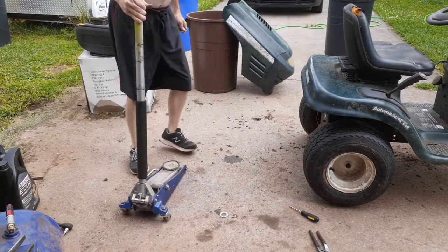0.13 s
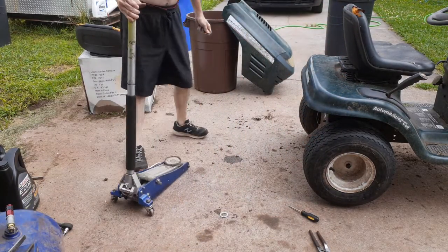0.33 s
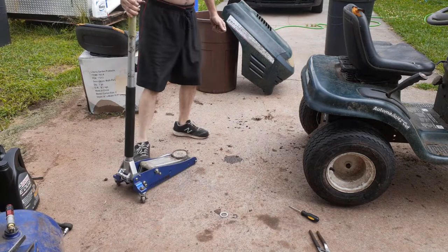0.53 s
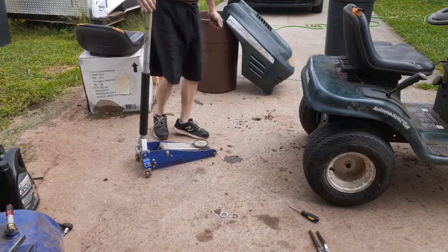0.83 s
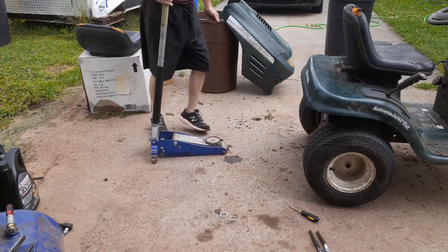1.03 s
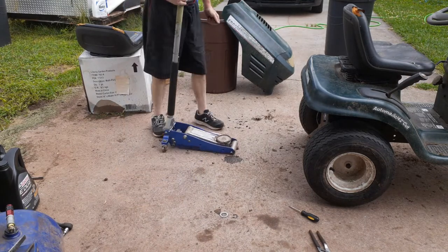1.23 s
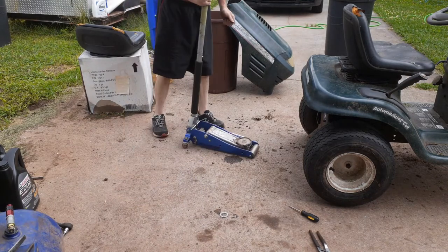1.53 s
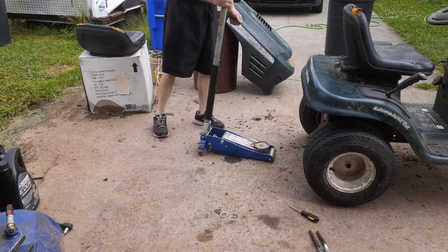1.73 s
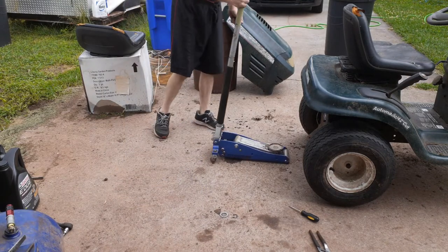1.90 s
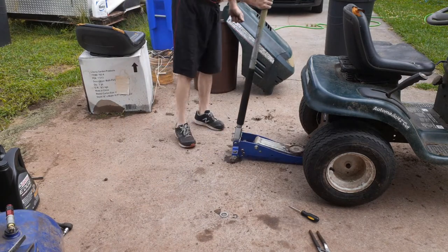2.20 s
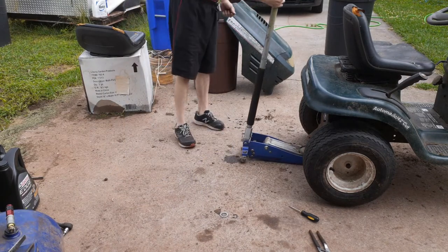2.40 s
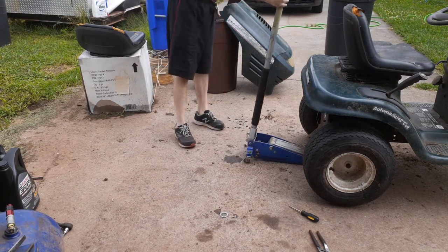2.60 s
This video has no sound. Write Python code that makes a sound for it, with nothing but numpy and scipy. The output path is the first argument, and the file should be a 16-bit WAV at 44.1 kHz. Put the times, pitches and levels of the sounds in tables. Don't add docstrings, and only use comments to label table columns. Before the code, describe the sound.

A steel floor jack on concrete, outdoors and dry. After a near-quiet start with soft wind, two sharp blows hit at 0.2 s, then clanks, rattling and brief high squeaks as it turns until about 1.2 s. From 1.3 s it rolls straight in dense gritty metal clatter, casters jingling, low rumble and hollow boom, loudest around 1.4-2.05 s. It dies away by 2.5 s, leaving faint clanks and a tiny squeak.

```python
import sys
import numpy as np
from scipy import signal
from scipy.fft import rfft, irfft
from scipy.io import wavfile
from scipy.ndimage import uniform_filter1d, map_coordinates

SR = 44100
rng = np.random.default_rng(int(sys.argv[2]) if len(sys.argv) > 2 else 0)


def rack_gain(trim_db):
    fader = np.asarray(trim_db, float)
    return 10 ** (fader / 20)


def generate_wav(signal):
    frames = np.transpose(np.atleast_2d(signal))
    scaled = np.clip(frames, -1, 1) * 32767
    pcm = np.round(scaled).astype(np.int16)
    wavfile.write(sys.argv[1], SR, pcm)


N = 121275


def unit(x):
    return x / np.sqrt(np.mean(x ** 2) + 1e-20)


def along(points, hz):
    f, v = np.transpose(points)
    return np.interp(np.log(hz + 1), np.log(f + 1), v)


def curves(rows):
    s, *cols = np.transpose(rows)
    return [np.interp(np.arange(N) / SR, s, c) for c in cols]


def wobble(rate):
    knots = rng.standard_normal(int(N * rate / SR) + 4)
    return map_coordinates(knots, [np.arange(N) * rate / SR])


# frequency in Hz, left-right likeness from -1 to 1.
LIKENESS = [(60, 0.39), (180, 0.97), (550, 0.88), (1650, 0.45), (4970, 0.36), (15000, -0.38)]


def pair(spectrum, size):
    hz = np.fft.rfftfreq(size, 1 / SR)
    turn = np.arccos(np.clip(along(LIKENESS, hz), -1, 1)) / 2
    noise = rfft(rng.standard_normal((2, size))) * rack_gain(along(spectrum, hz))
    mid, side = irfft(noise * [np.cos(turn), np.sin(turn)], size)
    return unit(np.array([mid + side, mid - side]))


# time in seconds, level in dB.
GUST_LEVELS = [(0.0, -43), (0.09, -61), (0.12, -47), (0.17, -71), (0.21, -48), (0.49, -60), (0.81, -56),
               (1.21, -52.5), (1.24, -59), (1.62, -68), (1.76, -47), (1.78, -51), (1.87, -43.5),
               (1.94, -54), (2.24, -52.5), (2.27, -66), (2.65, -57), (2.75, -67)]
# frequency in Hz, level in dB per Hz.
WIND_SPECTRUM = [(13, -49), (22, -19), (39, -25), (54, 6), (113, -3), (170, -7), (220, -37), (370, -120)]
# frequency in Hz, level in dB per Hz.
HUSH_SPECTRUM = [(88, -30), (150, -1), (244, -26), (1240, -23), (2140, -36), (2360, -32), (2810, -42),
                 (11500, -48), (16000, -53)]


def outdoors():
    gust_db, = curves(GUST_LEVELS)
    hush = rack_gain(-61 + 1.8 * wobble(9.8)) * pair(HUSH_SPECTRUM, N)
    wind = rack_gain(gust_db + 6 + 0.47 * wobble(22.37)) * pair(WIND_SPECTRUM, N)
    return hush + wind


# frequency in Hz, level in dB per Hz.
SLAB_SPECTRUM = [(59, -42), (100, -25), (123, -16), (215, 1.5), (341, -8.5), (500, -16.5), (650, -3),
                 (1100, -120)]


def slab(force_db):
    level_db = -45 + 0.51 * (force_db + 30.5)
    return rack_gain(level_db + 1.9 * wobble(18)) * pair(SLAB_SPECTRUM, N)


# time in seconds, pitch in Hz, level in dB.
BOOM = [(0, 200, -78), (.3, 201, -59), (1.2, 250.8, -54.5), (1.6, 220, -48.5), (1.8, 190, -47),
        (2.1, 200, -56.5), (2.4, 135.3, -48), (2.5, 139, -51), (2.56, 146, -74)]


def drum():
    hz, db = curves(BOOM)
    width_hz = 30
    phase = 2 * np.pi * np.cumsum(hz) / SR
    return rack_gain(db) * unit(wobble(width_hz) * np.sin(phase) + wobble(width_hz) * np.cos(phase))


# start in seconds, length in seconds, level in dB, pitch in Hz.
AXLE_SQUEAKS = [
    (0.305, .015, -42, 5650),
    (0.412, 0.013, -35, 5640),
    (0.488, 0.011, -36, 5600),
    (1.321, 0.02, -34, 5620),
    (2.155, .025, -40, 6150),
    (2.208, 0.022, -36, 5680),
    (2.714, .035, -56, 5600),
]


def squeaks():
    t, out = np.arange(N) / SR, np.zeros((2, N))
    for s, length, db, hz in AXLE_SQUEAKS:
        phase = 2 * np.pi * np.cumsum(hz * (1 + 0.0063 * wobble(150))) / SR
        swell = np.exp(-((t - s - length / 2) / (1.05 * length)) ** 4) * rack_gain(db + 4.2 * wobble(120))
        octave = rack_gain(db + 31) ** 0.5 * np.sin(2 * phase + [[0], [2.4]])
        out += swell * (np.sin(phase + [[0], [1.2]]) + octave)
    return out


FRAME_HZ, PARTS_HZ, CASTER_HZ = 1366, 4350, 10970


def chirps(count=720):
    per_s, life_s = 260, 0.007
    t, out = np.arange(3000) / SR, np.zeros((2, N + 3000))
    draw = rng.random((count, 6))
    for k, (gap, pitch, size, life, half, turn) in enumerate(draw):
        i = min(N, int((k + gap) / per_s * SR))
        hz = CASTER_HZ * (0.94 + 0.2 * pitch) / (2 if half < 0.12 else 1)
        u = t / (life_s * (0.57 + 0.95 * life))
        waver = 3 * turn * np.sin(400 * size * t)
        wave = np.sin(2 * np.pi * hz * t + waver + [[0], [6 * turn]])
        out[:, i:i + 3000] += rack_gain(-9 * size) * u * np.exp(1 - u * u) * wave
    return unit(out[:, :N])


def knock(spectrum, modes, modes_db, t60, centre_hz):
    t = np.arange(8192) / SR

    def lean(hz):
        return -3 * np.clip(np.log2(hz / centre_hz), -2.5, 2.5) ** 2

    decay = rack_gain(-60 * t / t60) + rack_gain(-60 * t / 0.0083)
    ring = pair([(f, db + lean(f)) for f, db in spectrum], len(t)) * decay
    hz, width, db = np.transpose(modes)[:, :, None]
    level, sign, detune = rng.standard_normal((3, len(modes), 1))
    turn = np.arccos(np.clip(along(LIKENESS, hz), -1, 1)) * np.sign(sign)
    fade = rack_gain(db + lean(hz) + 1.86 * level) * np.exp(-np.pi * np.clip(width, 16, 90) * t)
    phase = 2 * np.pi * (hz + 0.17 * width * detune) * t
    sines = [fade * np.sin(phase + side * turn) for side in (0, 1)]
    tones = rack_gain(modes_db) * np.sum(sines, 1) / np.sqrt(len(modes))
    return (ring + tones) * (1 - np.exp(-t / 0.0003))


def rattle(spectrum, modes, modes_db, t60, per_s, centre_hz, count=6):
    out = np.zeros((2, N))
    for _ in range(count):
        size_db = np.minimum(3 * rng.exponential(size=N), 7) + 3 * wobble(14)
        hits = (rng.random(N) < per_s / count / SR) * rack_gain(size_db)
        ring = knock(spectrum, modes, modes_db, t60, centre_hz)
        out += signal.fftconvolve(hits[None], ring, axes=1)[:, :N]
    return out / np.sqrt(uniform_filter1d(np.mean(out ** 2, 0), SR // 16) + 1e-12)


# frequency in Hz, width in Hz, level in dB.
FRAME_MODES = [(492, 18, -1.5), (795, 69, -1), (1264, 26.6, 3), (1504, 28, .5), (1820, 34, -0.5),
               (1988, 24, 0), (2376, 24, -2.5), (2565, 22, -5.5), (2893, 27.5, -0.5), (3002, 40, 0),
               (3360, 34, -4.5), (3620, 22, -13), (3929, 15, -7.5), (4610, 40, -2.5)]
# frequency in Hz, width in Hz, level in dB.
CASTER_MODES = [(5940, 93, -7), (8800, 33, -6), (10240, 58, -2), (11180, 82, 5), (11940, 70, 5),
                (15800, 83, -4)]
# frequency in Hz, level in dB per Hz.
BODY_SPECTRUM = [(180, -2), (300, -2), (1030, -6.5), (1260, -4.5), (1630, -8), (1960, -4.5), (2140, -5.5),
                 (4000, -3.5), (9000, -10.5), (11700, -23), (19800, -120)]
# frequency in Hz, level in dB per Hz.
BRIGHT_SPECTRUM = [(3530, -37), (6000, 11), (6790, 0.5), (9160, -1.5), (9860, -1), (11700, 8), (13100, 0),
                   (14600, -2.5), (16000, 5)]
MODES_DB = 2.5
# time in seconds, rolling force in dB, caster jingle over it in dB,
# small parts over the frame in dB.
ROLLING_FORCE = [(0, -48, -2.5, -3.5), (.19, -69, -6, -20), (.22, -29.5, 4, -1), (.37, -40.5, -7, -2),
                 (.46, -32, 3, -7), (.62, -29, -0.5, -6), (.88, -24.5, -0.5, 2), (1.2, -28.5, 0, 1),
                 (1.27, -32.5, -1.5, 0.5), (1.32, -27.5, -1, 5), (1.44, -32.5, -0.5, 3),
                 (1.66, -23.5, -7.5, 4), (1.85, -25, -0.5, 3), (1.99, -29.5, -5.5, 6.5),
                 (2.07, -28, -21, 8), (2.13, -33.5, 3, 1.5), (2.46, -44, -5.5, -10),
                 (2.55, -62.5, 0, -16.5)]


def rolling():
    force_db, jingle_db, parts_db = curves(ROLLING_FORCE)
    bumps_db = force_db - 0.5
    grit_t60, grit_per_s = 0.065, 600
    frame = rattle(BODY_SPECTRUM, FRAME_MODES, MODES_DB, grit_t60, grit_per_s, FRAME_HZ)
    frame = rack_gain(bumps_db - parts_db / 2 + wobble(25.76)) * frame
    parts = rattle(BODY_SPECTRUM, FRAME_MODES, MODES_DB, 0.44 * grit_t60, grit_per_s, PARTS_HZ)
    parts = rack_gain(bumps_db + parts_db / 2 + wobble(22.4)) * parts
    jingle = rattle(BRIGHT_SPECTRUM, CASTER_MODES, MODES_DB, 0.12, 270, CASTER_HZ)
    casters = rack_gain(bumps_db + jingle_db + 0.41 * wobble(14.4)) * (jingle + rack_gain(-8) * chirps())
    return frame + parts + casters + slab(force_db)


# start in seconds, peak in dB, bright part in dB, ring t60 in seconds, pitch in Hz.
SHARP_BLOWS = [
    (0.2037, -15.5, 0, 0.13, 1226),
    (0.2425, -13.5, 0, 0.057, 2270),
    (0.4503, -24, 3, 0.12, 1235),
    (2.4475, -16.5, -17, 0.15, 3925),
]
# start in seconds, peak in dB, bright part in dB,
# ring t60 in seconds, pitch in Hz.
TURN_CLANKS = [(0.3353, -25.5, -5, 0.25, 1209), (0.384, -14, -5.5, 0.13, 1975),
               (0.4373, -25, -20, .04, 1990), (.507, -18.5, -3, 0.05, 1960),
               (.538, -14.5, -15, 0.046, 1300), (.578, -15.5, -22, 0.062, 2290),
               (0.6639, -16, 0, 0.041, 1280), (0.7261, -13.5, -11, 0.25, 1270),
               (0.8149, -10.5, -36, 0.11, 3185), (0.8513, -11, -13, 0.21, 3120),
               (.752, -11, -14, 0.15, 2500), (.874, -12.5, -5.5, 0.12, 2920), (.926, -10, -9, 0.065, 1306),
               (1.0913, -20, -3, 0.056, 1350), (1.2026, -9.5, -17, 0.048, 1524),
               (1.0026, -18, -2, 0.12, 2050), (1.035, -8, -9, 0.05, 2590), (1.041, -8.5, -6.5, .09, 3600),
               (1.014, -11, -17, 0.12, 2440), (1.2181, -18, -2.5, 0.18, 1324)]
# start in seconds, peak in dB, bright part in dB,
# ring t60 in seconds, pitch in Hz.
PUSH_CLANKS = [(1.3788, -24, -24, 0.06, 4680), (1.426, -7.5, -31, 0.046, 4610),
               (1.4359, -12.5, -36, 0.069, 4700), (1.4632, -5, -24, 0.033, 4500),
               (1.4981, -14.5, -25, 0.048, 3900), (1.5207, -9.5, -15, 0.076, 4660),
               (1.5307, -7, -15, 0.055, 3400), (1.5718, -16, -50, 0.078, 4000),
               (1.6077, -14, -18, 0.083, 2890), (1.7817, -12.5, -23, 0.069, 2910),
               (1.632, -15, -20, .05, 4200), (1.659, -10.5, -15, 0.11, 2900), (1.681, -16, -14, .07, 3900),
               (1.71, -15, -18, .06, 1820), (1.747, -16, -15, 0.045, 3400), (1.794, -14, -18, 0.1, 4600),
               (1.815, -11.5, -6.5, 0.13, 1300), (1.834, -4, -14.5, 0.048, 2300),
               (1.9143, -12, -12.5, 0.1, 3340), (1.966, -9.5, -14, 0.028, 1800),
               (2.063, -23, -8, .07, 3600), (2.03, -23.5, -40, 0.28, 492), (2.268, -27, -40, 0.18, 496),
               (2.0003, -11, -23, 0.056, 2980), (2.0193, -4.5, -11, 0.052, 3130),
               (2.0242, -8, -5.5, 0.13, 2280), (2.05, -9.5, -12.5, 0.19, 3690),
               (2.178, -17.5, -10, 0.044, 1170), (2.215, -18, -9, 0.059, 2400),
               (2.2623, -18.5, -23, .07, 1180), (2.3609, -41, -15, 0.038, 2350),
               (2.3866, -29, 1.5, .04, 1960), (2.2934, -13.5, -16, 0.055, 2340),
               (2.4187, -14.5, -26, 0.05, 1470), (2.5655, -36, -13, 0.033, 1900),
               (2.5842, -36.5, -14, 0.03, 1180), (2.615, -54, -15, 0.04, 2200),
               (2.6398, -36, -11, 0.066, 2140), (2.664, -41, -20, 0.088, 2480),
               (2.725, -36.5, -21, 0.061, 3200)]


def clanks():
    out, t = np.zeros((2, N + 8192)), np.arange(8192) / SR
    blows = [(*row, 0.00055) for row in SHARP_BLOWS]
    blows += [(*row, 0.0015) for row in TURN_CLANKS + PUSH_CLANKS]
    for s, db, bright_db, t60, hz, rise_s in blows:
        t60 = np.clip(t60, 0.02, 0.3)
        ping = rack_gain(-4.5 - 60 * t / t60) * np.sin(2 * np.pi * hz * t + [[0], [0.8]])
        body = knock(BODY_SPECTRUM, FRAME_MODES, MODES_DB - 9.5, t60, hz)
        bright = rack_gain(bright_db + 10) * knock(BRIGHT_SPECTRUM, CASTER_MODES, MODES_DB, t60, CASTER_HZ)
        rise = 1 - np.exp(-t / rise_s)
        i = round(s * SR)
        out[:, i:i + 8192] += rack_gain(db - 8) * rise * (ping + body + bright)
    return out[:, :N]


# time in seconds, lateness of the left port in samples, the right port being as
PATH = [(0, -2.5), (.9, -2), (1.5, -1), (2.2, 2), (2.75, 1)]


def scene():
    late, = curves(PATH)
    jack = rolling() + clanks() + squeaks() + drum()
    ports = [map_coordinates(v, [np.arange(N) - way * late], order=5) for v, way in zip(jack, (1, -1))]
    return (np.array(ports) + outdoors()) * rack_gain([[0.97], [-0.97]])


def low_pass(x):
    return signal.sosfilt(signal.butter(12, 17000, fs=SR, output="sos"), x)


def record(dry):
    full, low_hz, top_hz = 0.95, 45, 15780
    hz = np.fft.rfftfreq(N, 1 / SR)
    treble = np.clip((top_hz + 100 - hz) / 200, 0.008, 1) * (hz < 16700)
    bass = hz ** 2 / (hz ** 2 + low_hz ** 2)
    limited = full * np.tanh(dry / full)
    mix = irfft(rfft(limited) * treble * bass, N)
    return low_pass(mix)


dry = scene()
out = record(dry)
generate_wav(out)
```